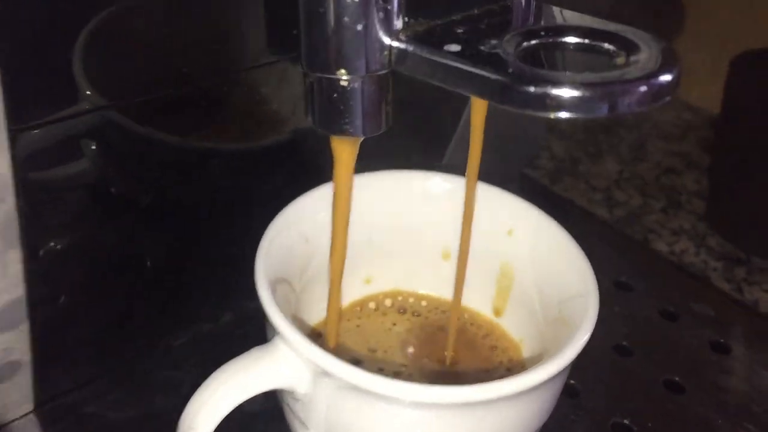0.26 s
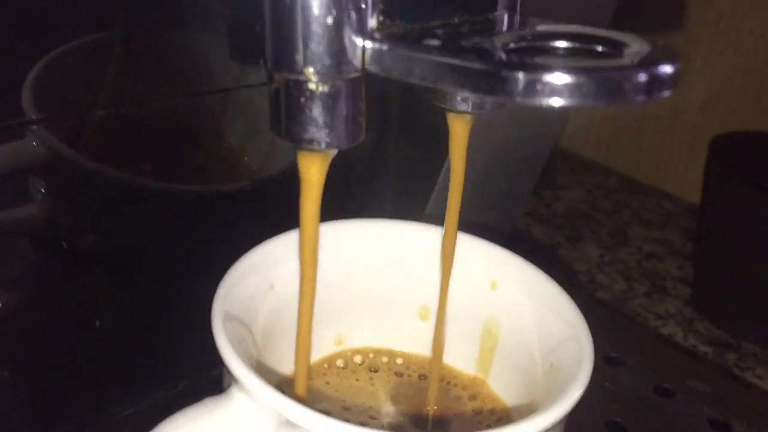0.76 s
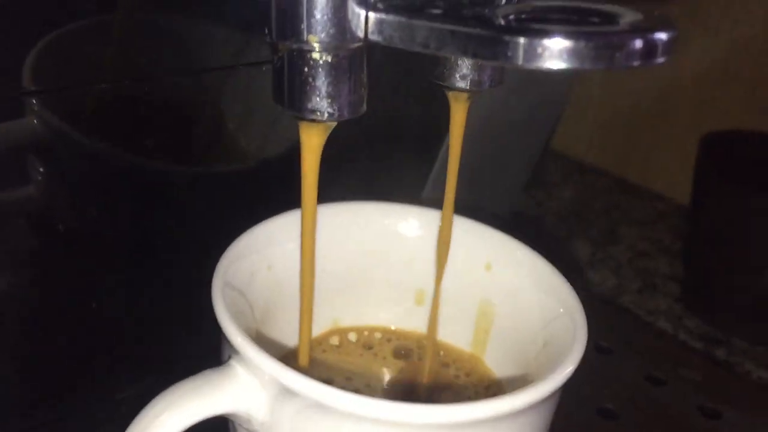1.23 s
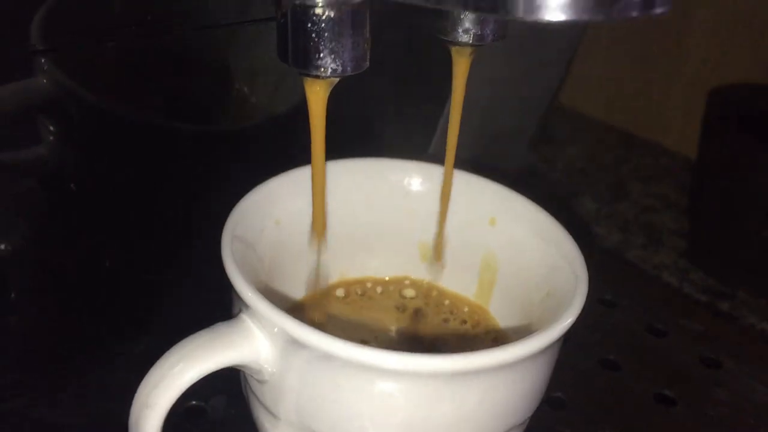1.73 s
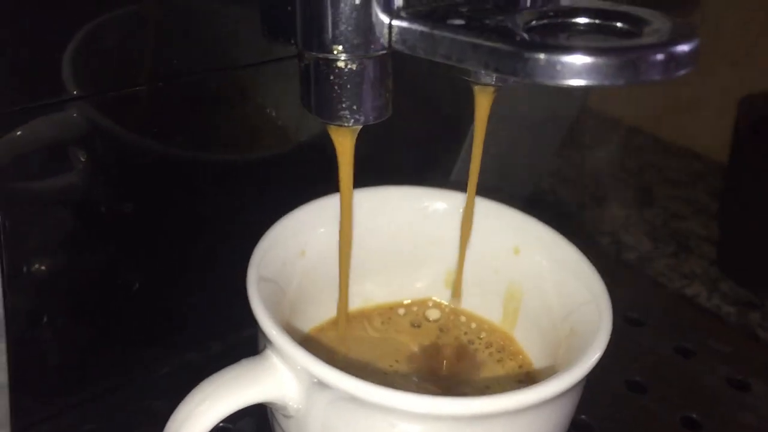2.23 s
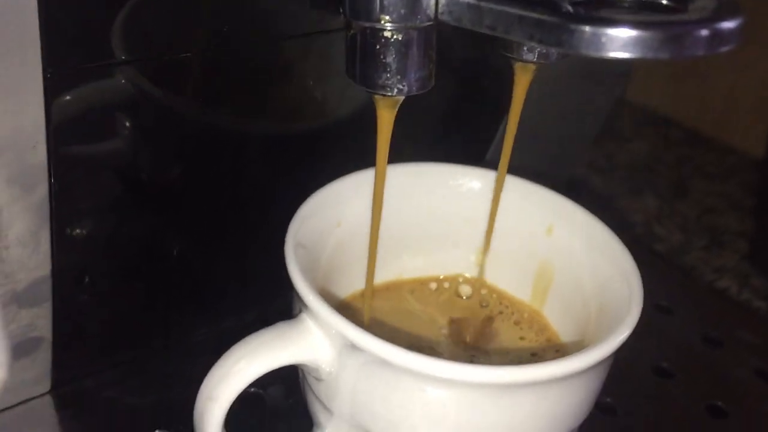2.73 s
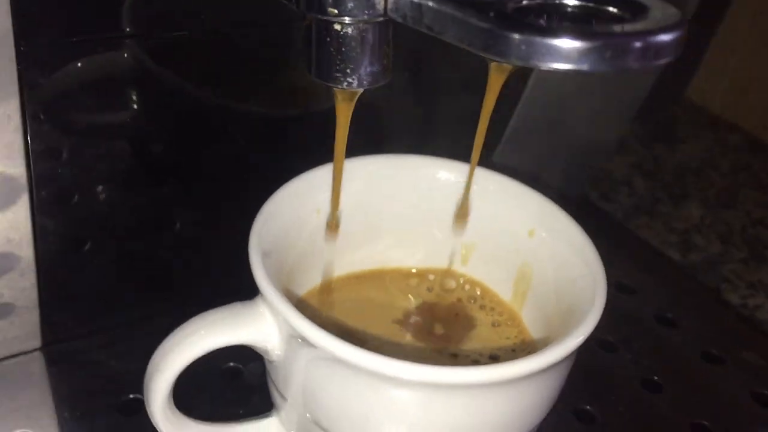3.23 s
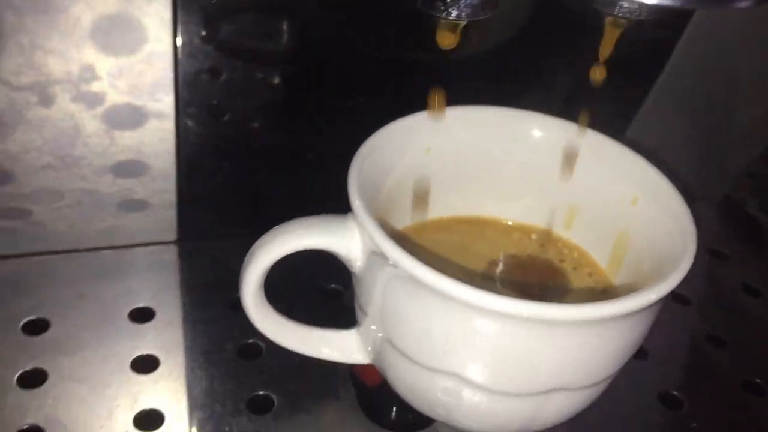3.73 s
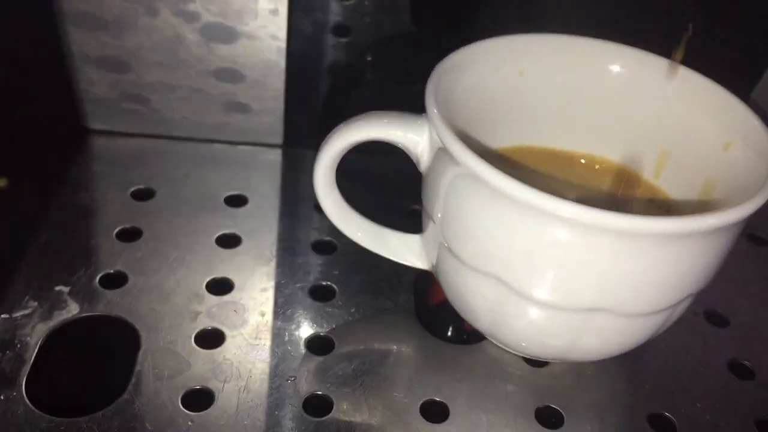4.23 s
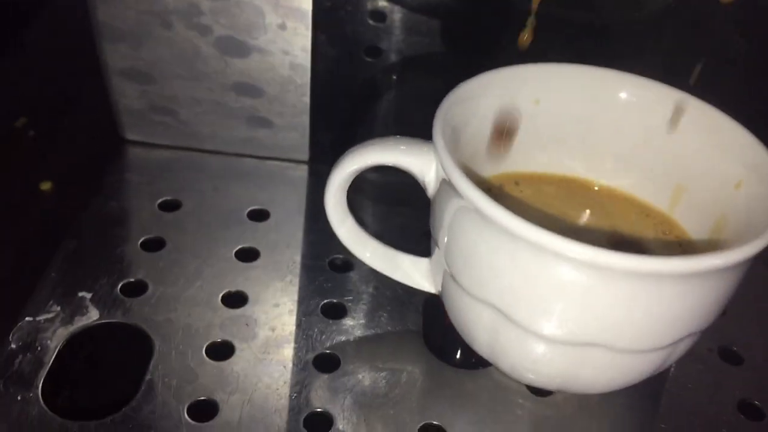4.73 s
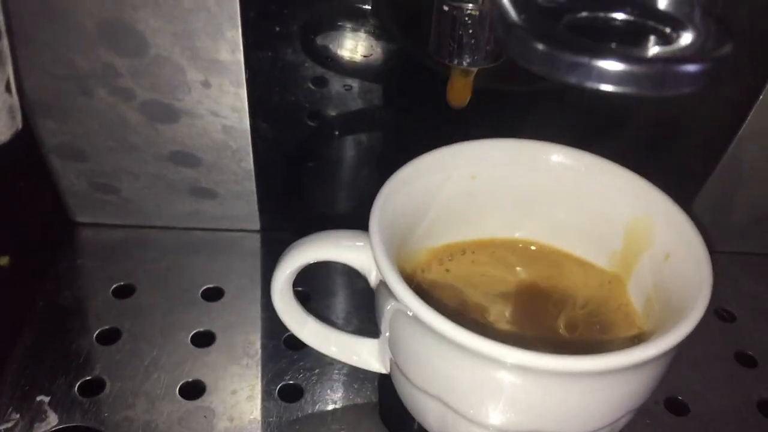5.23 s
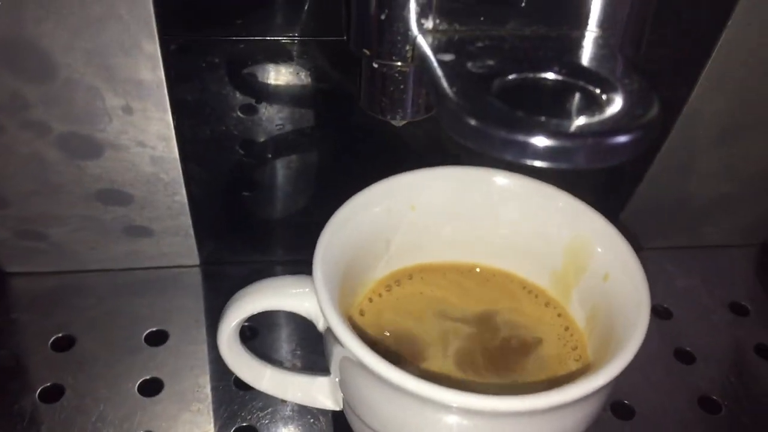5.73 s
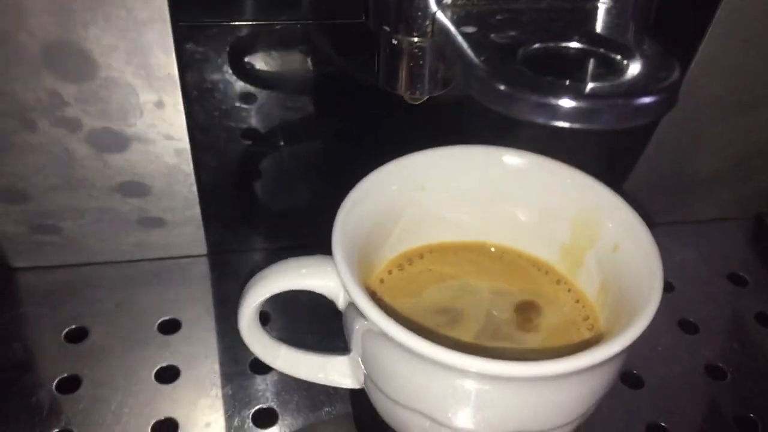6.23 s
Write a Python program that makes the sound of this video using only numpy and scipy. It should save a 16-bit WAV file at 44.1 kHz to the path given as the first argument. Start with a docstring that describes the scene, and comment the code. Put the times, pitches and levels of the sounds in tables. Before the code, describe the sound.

Close and fairly dry, in a quiet kitchen with faint room noise. From the start an espresso machine's pump gives a low, buzzing mains-rate hum with housing rattle and pulsing hiss, while coffee drops patter into a china cup. At about 0.9 seconds the pump cuts out, its hum fading quickly with a faint lingering tone. Thin streams go on trickling, with bubbly plips, small ticks and hollow cup resonances, plus a few very soft bumps around 2.4 to 2.8. After 3.3 the trickle thins to sparse, weakening drips. At 3.9 a latch snaps sharply with a brief ring. Near-silence follows until 4.4, when a geared motor starts with a clunk and scrape, spinning up quickly to a midrange whine over rumble and thin whistle. Strong plastic knocks come around 4.6, lighter ones at 4.8, 5.3 and 5.8. From 5.5 the whine strains and throbs, still running at the end, about 6.4.

```python
"""Espresso machine ending a pour

A pump hums and hisses to about 1 s: harmonics of its stroke rate with noise modulated by each stroke.
Thin streams patter into a china cup and thin to drips: each drop is a splash, a bubble and a cup resonance.
A latch snaps: noise bursts through resonant bodies. A geared motor then moves the brew unit: a mesh tone
with shaft sidebands, a thin whistle and noise, among plastic knocks and scrapes built of modes and bursts."""
import sys
import numpy as np
from scipy import signal
from scipy.fft import rfft, irfft, next_fast_len
from scipy.io import wavfile
from scipy.ndimage import uniform_filter1d

SR = 44100
rng = np.random.default_rng(int(sys.argv[2]) if len(sys.argv) > 2 else 0)


def master_out(mix):
    """Clip the mix to full scale and print it as 16-bit PCM to the path in sys.argv[1]."""
    frames = np.transpose(np.atleast_2d(mix))
    ceiling = np.clip(frames, -1, 1)
    pcm = np.round(ceiling * 32767).astype(np.int16)
    wavfile.write(sys.argv[1], SR, pcm)


N = 284886
TIME = np.arange(N) / SR
BRIEF = np.arange(8192) / SR  # time axis of one drop or knock, s


def amp(db):
    """Decibel law: level to amplitude ratio."""
    return 10 ** (np.asarray(db) / 20)


def unit(x):
    """Power normalisation: scales to rms 1."""
    return x / np.sqrt(np.mean(x ** 2) + 1e-20)


def crest(x, size=88):
    """Short-time power normalisation: the loudest 2 ms get rms 1."""
    power = uniform_filter1d(x ** 2, size, mode="constant")
    return x / np.sqrt(power.max() + 1e-20)


def add(mix, s, sound):
    """Superposition: adds a sound to the mix, in place, from time s."""
    part = mix[max(round(s * SR), 0):][:len(sound)]
    part += sound[:len(part)]


def gains(points, size):
    """Spectral envelope: levels interpolated along log frequency, on the bins of a transform."""
    hz, db = np.transpose(points)
    bins_hz = np.fft.rfftfreq(size, 1 / SR)
    return amp(np.interp(np.log(bins_hz + 1), np.log(hz + 1), db))


def noise(points):
    """Spectral shaping: white noise weighted by an envelope, rms 1."""
    size = next_fast_len(N, True)
    white = rfft(rng.standard_normal(size))
    return unit(irfft(white * gains(points, size), size)[:N])


def wander(hz):
    """Random modulation: line segments between hz random values per second, rms 1."""
    knots = rng.standard_normal(4096)
    return unit(np.interp(TIME * hz, np.arange(len(knots)), knots))


def body(points):
    """Minimum phase: the causal response of a body follows from its log spectrum by Hilbert transform."""
    log_gain = np.log(gains(points, len(BRIEF)))
    circle = np.concatenate([log_gain, log_gain[-2:0:-1]])
    return np.exp(np.conj(signal.hilbert(circle)))[:len(log_gain)]


def burst(response, rise, decay, grain_db=0):
    """Source and filter: a swelling, decaying noise burst excites a body; grain makes parts stand out."""
    shape = np.minimum(BRIEF / rise, 1) * np.exp(-np.maximum(BRIEF - rise, 0) / decay)
    grains = amp(grain_db * np.repeat(rng.standard_normal(len(BRIEF) // 32), 32))
    excitation = shape * grains * rng.standard_normal(len(BRIEF))
    return crest(irfft(rfft(excitation) * response))


def ring(hz, t60, rise, glide=0):
    """Damped mode: a sine with exponential decay, whose pitch climbs when glide is above 0."""
    phase = 2 * np.pi * hz * BRIEF * (1 + glide * (BRIEF / t60 - 1 / 4))
    decay = np.exp(-np.log(1000) * BRIEF / t60)
    return crest(np.sin(phase) * decay * (1 - np.exp(-BRIEF / rise)))


def run_down(stop, t60):
    """Free decay: full level until the stop, then an exponential fall."""
    return np.exp(-np.log(1000) * np.maximum(TIME - stop, 0) / t60)


# background spectrum: f/Hz, relative level/dB
ROOM_SPECTRUM = [(30, -8.5), (100, -5), (200, -11.5), (350, -3.5), (460, -14.5), (1500, -16.5),
                 (3000, -20.5), (7000, -24), (9300, -22.5), (10300, -31.5), (11500, -25), (15800, -27.5)]


def room_tone():
    """Broadband noise: the quiet of the kitchen, with a slight drift in level."""
    return amp(-64.5 + 0.28 * wander(4.3)) * noise(ROOM_SPECTRUM)


MAINS_HZ, PUMP_STOP_S = 50.03, .922
# pump hum: multiple of the stroke rate, level/dB (rms, before the run-down weights);
# the half orders come from unequal strokes
HUM_ORDERS = [(1, -59), (1.5, -54), (2, -45.5), (3, -34), (3.5, -47.5), (4, -46), (4.5, -57), (5, -32.5),
              (5.5, -63), (6, -42.5), (6.5, -46.5), (7, -48.5), (8, -50), (9, -52.5), (11, -57), (12, -51),
              (13, -52), (14, -48.5), (16, -51), (18, -54)]
# rattle of the housing: f/Hz, relative level/dB
RATTLE_SPECTRUM = [(30, -31), (70, -5), (200, 5), (380, 2.5), (540, -2), (660, 1), (840, 0.5), (915, 10),
                   (980, 0.5), (1230, 4.5), (1550, -10), (2100, -8.5), (3400, -14), (6000, -31),
                   (12000, -49)]
# hiss of the pump: f/Hz, relative level/dB
HISS_SPECTRUM = [(1760, -6), (3000, 1.5), (3640, -23), (3930, 6), (4220, -2), (5380, -3), (6010, 0.5),
                 (7830, -2.5), (8630, 0.5), (10300, -8), (12600, -2), (14700, -8), (15800, -15)]


def pump():
    """Periodic excitation: a piston at mains rate gives hum and modulates rattle and hiss; a panel rings on."""
    turn = 2 * np.pi * MAINS_HZ * TIME
    hum = 0
    for order, db in HUM_ORDERS:
        level = amp(db + .5 * wander(11.9)) * np.sqrt(2)
        hum = hum + level * np.cos(order * turn + rng.uniform(0, 2 * np.pi))
    hum_decay = 0.83 * run_down(0.96, .07) + 0.14 * run_down(1.0, 0.58)  # a fast and a slow part

    panel_swell = 1 - run_down(0.65, 0.11)
    panel = amp(-49) * np.sqrt(2) * np.sin(5 * turn) * run_down(0.89, 2.9) * panel_swell

    stroke = np.cos(turn - 2 * np.pi * 3 / 4)
    shaking = unit(amp(2.3 * stroke + 0.24 * wander(24.5)))
    rattle = amp(-35.5) * noise(RATTLE_SPECTRUM) * shaking
    puffs = unit(amp(4 * stroke + .9 * wander(30) + 1.5 * wander(450)))
    hiss = amp(-46.5) * noise(HISS_SPECTRUM) * puffs
    noises = rattle * run_down(PUMP_STOP_S, 0.3) + hiss * run_down(PUMP_STOP_S, 0.061)
    return hum * hum_decay + panel + noises


# drop rates: the stream's share drains away from THINS_AT_S and leaves the drips
STREAM_PER_S, DRIPS_PER_S, THINS_AT_S, DRAIN_S = 85, 8, 3.28, 0.041
# small drops: base level, the extra while the pump pushes, the fade once the streams thin
PATTER_DB, PUMPED_DB, DRIP_FADE_DB_PER_S = -49.5, 8, 20


def small_drops(count=700):
    """Random point process: drop times follow the integrated flow; rows have the columns of PLACED_DROPS."""
    draining = np.maximum(TIME - THINS_AT_S, 0)
    fallen = np.cumsum(DRIPS_PER_S + STREAM_PER_S * np.exp(-draining / DRAIN_S)) / SR
    level_db = PATTER_DB + PUMPED_DB * (TIME < PUMP_STOP_S) - DRIP_FADE_DB_PER_S * draining
    place = np.arange(count) + 2 * rng.random(count)  # jittered position in the count of fallen drops
    size, hollow, tick, pitch, cup, spray = np.clip(rng.standard_normal((count, 6)).T, -2, 2)

    s = np.interp(place, fallen, TIME)
    plip_db = np.interp(s, TIME, level_db) + 5 * np.minimum(size, 1.4)
    plip_hz = 1480 * np.exp(.13 * pitch)
    hollow_db = plip_db - 3.5 + 3 * hollow
    hollow_hz = (635 + 9 * s) * np.exp(0.032 * cup)
    tick_db = plip_db - 10.5 + 5.5 * np.minimum(tick, 1.3)
    # high ticks grow more frequent with time
    tick_hz = np.where(spray > 2.2 - .7 * s, 7000, 4550) * np.exp(0.071 * cup)
    rows = np.transpose([s, plip_db, plip_hz, hollow_db, hollow_hz, tick_db, tick_hz])
    return rows[place < fallen[-1]]


CUP_HZ = 678.4  # the pitch towards which the cup's ring settles after each drop
# single drops placed by time, loud and faint: t/s, plip level/dB, plip f/Hz, cup hollow level/dB,
# hollow f/Hz, splash tick level/dB, tick f/Hz
PLACED_DROPS = [(0.0159, -32.5, 1750, -47, 647, -49.5, 4300), (0.0538, -31.5, 1690, -45, 660, -44, 4300),
                (0.2059, -29.5, 1380, -38.5, 664, -53.5, 4200), (0.2972, -27, 1260, -46.5, 660, -42, 4500),
                (0.3097, -25, 1210, -46, 660, -36.0, 4240), (0.4444, -31, 1630, -49, 660, -46, 4200),
                (0.4604, -28.0, 1210, -40, 645, -36, 4200), (0.5402, -29.5, 1940, -44, 660, -36.5, 4370),
                (0.5526, -29.5, 1450, -39, 670, -42, 4100), (0.564, -38, 1800, -33.0, 670, -53.0, 4300),
                (0.7537, -29, 1500, -43, 660, -37, 4300), (0.832, -27.0, 1050, -32, 660, -40, 5970),
                (0.852, -26.5, 1090, -39, 660, -35, 4720), (0.9224, -46, 1540, -50, 660, -35.5, 4560),
                (1.0261, -42, 1540, -41.5, 624, -38, 8560), (1.0385, -38, 1260, -34.5, 645, -48, 4400),
                (1.0464, -45, 1510, -39, 620, -32.5, 4300), (1.0705, -34, 1160, -40, 670, -39, 4200),
                (1.112, -40, 1640, -58, 700, -60, 4500), (1.1438, -40, 1490, -43, 670, -57, 4600),
                (1.159, -42, 1410, -46, 680, -65.0, 4200), (1.2186, -37, 1870, -49, 673, -36, 4340),
                (1.266, -37, 1510, -33.5, 662, -35, 4540), (1.2888, -40, 1290, -45, 620, -47, 4600),
                (1.3005, -40, 1470, -45.5, 684, -61, 4400), (1.3139, -33.5, 1160, -43, 668, -57, 4500),
                (1.335, -49, 800, -51, 650, -57.0, 4500), (1.3578, -41.5, 1830, -49.0, 646, -46.5, 13500),
                (1.4007, -34.5, 1433, -38, 684, -38, 4750), (1.4716, -40, 1500, -45, 664, -42, 4440),
                (1.481, -45, 1810, -47.5, 676, -60, 4470), (1.5489, -44, 1520, -42, 657, -45.5, 4700),
                (1.595, -48.5, 1520, -38.5, 664, -64.5, 4600), (1.68, -47, 1430, -44, 656, -55, 4340),
                (1.715, -49, 850, -57.0, 673, -65.5, 13700), (1.7494, -31, 1504, -37.5, 667, -44.5, 4400),
                (1.7973, -42.0, 1910, -42.0, 680, -40.0, 4370),
                (1.8796, -36.5, 1460, -47.0, 630, -47, 4400), (1.91, -40.5, 1610, -45.5, 664, -50, 4370),
                (1.952, -37, 1450, -44.0, 683, -46.5, 4500), (2.0133, -36, 1510, -44, 624, -39.5, 4300),
                (2.0333, -47, 1480, -40, 660, -33, 4360), (2.045, -42, 1520, -52, 640, -53, 4500),
                (2.0976, -41, 1480, -40.5, 645, -58, 4300), (2.166, -39, 1480, -37, 660, -47, 4400),
                (2.2303, -33.0, 1460, -40.0, 644, -56, 4700), (2.2454, -35.5, 1820, -37, 662, -37.5, 4400),
                (2.3241, -38.5, 1570, -37.5, 657, -36.5, 14400),
                (2.4139, -37, 1530, -36.5, 646, -38.5, 4450), (2.4518, -29, 1520, -39, 653, -30, 4440),
                (2.478, -38, 1420, -44, 657, -46, 5560), (2.4874, -38, 1450, -41.5, 647, -49, 4100),
                (2.521, -45.0, 1700, -41.5, 662, -45, 6900), (2.533, -50.5, 1710, -48.0, 697, -41, 4370),
                (2.5671, -34, 1500, -35.5, 659, -45, 6900), (2.599, -43.5, 1490, -51, 640, -48.5, 13900),
                (2.6654, -40.5, 1440, -40, 630, -53, 4400), (2.701, -42, 1400, -43.5, 655, -53, 4630),
                (2.7736, -37.5, 1440, -41, 684, -41.5, 6050), (2.87, -60, 1830, -59, 710, -50, 4470),
                (2.9527, -36, 1470, -52, 680, -50, 4740), (2.996, -40, 1500, -58, 650, -49, 4600),
                (3.036, -36, 1600, -38.5, 663, -53.0, 4400), (3.076, -46, 1630, -45, 660, -52, 4500),
                (3.0969, -38.5, 1670, -54, 654, -39.5, 4600), (3.1428, -54, 1490, -45.5, 640, -46.5, 7300),
                (3.2365, -41, 1540, -49, 668, -49, 4000), (3.272, -47, 1500, -50, 646, -49, 7300),
                (3.3268, -44.0, 1820, -45.5, 685, -54, 4400), (3.4336, -47, 1560, -45, 680, -59, 4420),
                (3.4575, -38.5, 1497, -39, 673, -60, 4400), (3.5808, -40.5, 1620, -43.0, 675, -42.5, 4250),
                (3.651, -64, 1800, -54.0, 689, -55, 4400), (3.707, -70, 1210, -55.5, 680, -72.0, 8400),
                (3.7913, -43.5, 1230, -44, 689, -51.5, 4300), (3.8625, -45.0, 1880, -44.5, 680, -47, 4240)]
# colour of a drop's plop: f/Hz, relative level/dB
PLOP_SPECTRUM = [(80, -38.5), (200, -32), (400, -23), (560, -24), (850, -13.5), (960, -32), (1100, -2),
                 (1250, -15.5), (1490, 4), (1900, -2), (2150, -24), (2330, -17), (2900, -24), (5000, -52)]
# colour of a drop's tick: f/Hz, relative level/dB
TICK_SPECTRUM = [(100, -21), (400, -7), (900, -11), (1500, -9), (2400, -9), (2850, -23), (3200, 1.5),
                 (3750, -3.5), (4400, 12), (5200, 0.5), (5800, -4), (6600, -3.5), (8500, -7.5),
                 (10200, -12.5), (12000, -4.5), (14000, -8), (16000, -9)]


def pour():
    """Bubble and cavity resonance: a drop ticks on the crema, traps a rising bubble and rings the cup's air."""
    out, plop, tick = np.zeros(N), body(PLOP_SPECTRUM), body(TICK_SPECTRUM)
    drops = np.vstack([PLACED_DROPS, small_drops()])
    for s, plip_db, plip_hz, hollow_db, hollow_hz, tick_db, tick_hz in drops:
        softness = 2 ** rng.uniform(-0.21, 0.73)  # foam cushions some drops more than others

        gulp = ring(hollow_hz, t60=.038, rise=.006, glide=.02)
        gulp = gulp + .14 * ring((hollow_hz + CUP_HZ) / 2, t60=.085, rise=.006)

        bubble = ring(plip_hz, t60=0.015 * softness, rise=0.0015 * softness, glide=0.03)
        bubble = bubble + 0.94 * burst(plop, rise=0.00075 * softness, decay=0.0017)

        splash = burst(tick, rise=.00008 * softness, decay=0.0011 * softness)
        splash = splash + 0.85 * ring(tick_hz, t60=.006 * softness, rise=0.00015)

        drop = amp(hollow_db) * crest(gulp) + amp(plip_db) * crest(bubble)
        add(out, s, drop + amp(tick_db) * crest(splash))
    return out


def kitchen(x, t60, wet_db):
    """Reverberation: faint scattered, decaying reflections from the machine's alcove and the room."""
    t = np.arange(SR // 2) / SR
    sparse = rng.random(len(t)) < 2500 / SR  # on average 2500 echoes a second
    decay = np.exp(-np.log(1000) * t / t60)
    taps = rng.standard_normal(len(t)) * sparse * (t > .002) * decay
    return x + amp(wet_db) * signal.fftconvolve(x, taps / np.linalg.norm(taps))[:N]


# soft low bumps: t/s, level/dB, f/Hz
SOFT_BUMPS = [(2.415, -52, 330), (2.73, -57, 310), (2.765, -59, 250), (2.835, -56, 100)]


def bumps():
    """Band-limited impact: each soft bump is a noise burst through one broad low resonance."""
    out = np.zeros(N)
    for s, db, bump_hz in SOFT_BUMPS:
        hump = [(bump_hz / 4, -24), (bump_hz, 0), (bump_hz * 2, -16), (bump_hz * 10, -60)]
        add(out, s, amp(db) * burst(body(hump), rise=0.0086, decay=0.021))
    return out


# snap of the latch: f/Hz, relative level/dB
SNAP_SPECTRUM = [(300, -53), (500, -9), (680, -2), (1000, -3), (1600, -6), (2200, -14), (3100, 1),
                 (4200, -6), (5600, -18), (7500, 4.5), (8800, 1.5), (10000, -15), (11050, 7.5),
                 (12300, -11), (14700, -3), (16000, -3)]
# ring of the housing after the snap: f/Hz, relative level/dB
HOUSING_SPECTRUM = [(300, -16), (660, 5.5), (1000, -1), (1600, -12), (2300, -12), (2720, 7.5), (2950, 6),
                    (3500, -2.5), (4400, -5), (5600, -17), (7600, 5), (9800, -5), (11100, 1), (12200, -18),
                    (15000, -4)]


def latch():
    """Impulsive excitation: one hard snap, and the ring of the housing after it."""
    out = np.zeros(N)
    add(out, 3.8803, amp(-17.5) * burst(body(SNAP_SPECTRUM), rise=.0012, decay=.0042))
    add(out, 3.883, amp(-38) * burst(body(HOUSING_SPECTRUM), rise=.0057, decay=.033))
    return out


MESH_HZ, SLOW_HZ, FAST_HZ = 1254.6, 22.7, 33.2  # tooth mesh at full speed, and the two shafts
WHINE_DB, WHINE_SWELL_S = -0.07, 0.16
# the gears take hold with a short squeal
BITE_S, BITE_WIDTH_S, BITE_DB = 4.457, .02, -27
TIGHTEST_S = 5.94  # where both shafts press the teeth together at once
# gear whine: sideband order of the slow shaft, of the fast shaft,
# level/dB running light, level/dB under load (before WHINE_DB)
WHINE_SIDEBANDS = [(0, 0, -37.5, -34), (-1, 0, -42, -35), (1, 0, -43, -44), (-1, 1, -50, -39),
                   (0, 1, -44, -47), (-1, -1, -42, -52), (-2, 0, -50, -47), (-2, -1, -51, -45),
                   (1, 1, -54, -49), (2, 1, -50, -53), (0, -1, -50, -52), (4, 0, -56, -50)]


def gear_whine(turn, age, load):
    """Modulation sidebands: two slightly eccentric shafts modulate the mesh tone, which throbs under load."""
    shafts = 2 * np.pi * (TIME - TIGHTEST_S)
    slack, whine = 1 - load, 0
    for m, n, light_db, loaded_db in WHINE_SIDEBANDS:
        # with slack in the gears the sidebands fall out of step: a flutter in place of a throb
        lag = slack * np.pi / 2 * (m ** 2 + n ** 2) + (.07 + .33 * slack) * wander(9)
        phase = MESH_HZ * turn + (m * SLOW_HZ + n * FAST_HZ) * shafts + lag
        whine = whine + amp(loaded_db + slack * (light_db - loaded_db)) * np.cos(phase)
    swell = amp(WHINE_DB) * np.minimum(age / WHINE_SWELL_S, 1)
    bite = amp(BITE_DB) * np.exp(-((TIME - BITE_S) / BITE_WIDTH_S) ** 2)
    return swell * whine + bite * np.cos((MESH_HZ - SLOW_HZ) * turn)


# whistle: pitch without load, the share by which it sags under full load, base levels, swell time
WHISTLE_HZ, WHISTLE_SAG = 4097, .017
WHISTLE_LIGHT_DB, WHISTLE_LOADED_DB, WHISTLE_SWELL_S = -58, -62, .55
# partials of the whistle: multiple of its pitch, level/dB running light, level/dB under load
# (both relative to the base levels)
WHISTLE_PARTIALS = [(2 / 9, 7, 0), (1 / 3, 4, 5), (2 / 3, -2, -10), (1, -1.5, -1), (7 / 6, -19, -22),
                    (2, -30, -17)]


def pinion(age, load):
    """Frequency modulation: a thin wavering whistle swells in; load lowers its pitch and most partials."""
    waver = .002 * wander(12) + .0055 * wander(260)
    turn = 2 * np.pi * np.cumsum(WHISTLE_HZ * (1 - WHISTLE_SAG * load) * (1 + waver)) / SR
    whistle = 0
    for k, light_db, loaded_db in WHISTLE_PARTIALS:
        level_db = (1 - load) * (WHISTLE_LIGHT_DB + light_db) + load * (WHISTLE_LOADED_DB + loaded_db)
        whistle = whistle + amp(level_db + 2.8 * wander(18)) * np.cos(k * turn)
    return np.minimum(age / WHISTLE_SWELL_S, 1) * whistle


# the motor starts slow by the share START_LAG, with a surge of rumble, and settles at full speed
START_S, START_LAG, SPIN_UP_S = 4.364, .15, .075
RUMBLE_DB, SURGE_DB, SURGE_S = -31.5, 1, 0.21
# load on the gears: t/s, load (0 to 1)
GEAR_LOAD = [(4.45, 0.15), (4.6, 0.35), (4.7, 0.05), (4.8, 0.62), (4.89, 0.01), (5.3, 0.01), (5.47, 0.15),
             (5.55, .92), (5.8, 1), (6.46, 0.95)]
# steady tones of the motor: f/Hz at full speed, level/dB (rms, before a common trim)
MOTOR_TONES = [(81, -55.5), (200, -49.5), (230, -52.5), (300.3, -40), (400.3, -44.5), (500.6, -45.5),
               (600.6, -46), (696, -49), (770, -62.5)]
# rumble of the gear train: f/Hz, relative level/dB
RUMBLE_SPECTRUM = [(25, -34.5), (55, -13.5), (80, 3), (140, 0.5), (220, 6.5), (270, 0), (350, 7), (480, 7),
                   (700, 7.5), (830, -2), (1040, -3.5), (1250, 11.5), (1450, -4), (1750, -29), (5000, -58)]
# thin rasp of the gear train: f/Hz, relative level/dB
RASP_SPECTRUM = [(1300, -6), (1600, 3.5), (2200, -5), (2690, 4.5), (2880, -7.5), (3100, -3.5), (3480, -2.5),
                 (3880, -11.5), (4050, -6), (4300, -11), (4700, -13), (5000, -20), (5250, -13.5),
                 (5600, -17), (5950, -13), (6300, -21), (6700, -14), (7000, -20), (7250, -16),
                 (7650, -24.5), (8070, -14.5), (8450, -24.5), (9000, -20), (10400, -28.5), (11500, -23),
                 (12800, -31), (14000, -28), (15800, -38)]


def motor():
    """Rotating machinery: tones follow the shaft speed, over the broadband rumble and rasp of the gears."""
    age = np.maximum(TIME - START_S, 0)
    load = np.clip(np.interp(TIME, *np.transpose(GEAR_LOAD)), 0, 1)
    running = np.minimum(age / 0.0079, 1)
    speed = (1 - START_LAG * np.exp(-age / SPIN_UP_S)) * (1 + .001 * wander(20))
    turn = 2 * np.pi * np.cumsum(speed) / SR  # phase of a 1 Hz tone at full speed

    tones = 0
    for hz, db in MOTOR_TONES:
        phase = hz * turn + 0.21 * wander(8.6) + rng.uniform(0, 2 * np.pi)
        tones = tones + amp(db + 2 * wander(7)) * np.cos(phase)
    pitched = gear_whine(turn, age, load) + amp(-.5) * tones + pinion(age, load)

    body_db = RUMBLE_DB + SURGE_DB * np.exp(-age / SURGE_S)
    rumble = amp(body_db - 1 + 1.63 * wander(45)) * noise(RUMBLE_SPECTRUM)
    rasp = amp(body_db - 20.5 + 1.55 * wander(60)) * noise(RASP_SPECTRUM)
    return running * (np.sqrt(2) * pitched + rumble + rasp)


# hard knocks: t/s, knock level/dB, knock f/Hz, thud level/dB, clack level/dB, brightness f/Hz
HARD_KNOCKS = [(4.368, -32, 1230, -33, -54, 3000), (4.5678, -20, 1080, -25, -28.5, 9000),
               (4.584, -40, 1035, -25.5, -55, 3000), (4.6201, -17.5, 900, -24, -34, 2500),
               (4.803, -37, 1030, -34, -38, 4500), (5.337, -41, 1035, -32, -45.5, 3500),
               (5.826, -31, 1490, -35, -33, 5000)]
# rebounds of each knock: nominal delay t/s, level/dB relative to the clack
REBOUNDS = [(0, -8), (.003, -12), (.007, -14), (0.011, -18)]
# scrapes and rattles: t/s, thud level/dB, clack level/dB, brightness f/Hz, rise t/s, decay t/s
SCRAPE_EVENTS = [(4.382, -25, -39.5, 14000, .0046, 0.045), (4.495, -56, -44, 9000, 0.0011, 0.0073),
                 (4.571, -34, -41, 3500, .002, .007), (4.597, -40, -38, 3500, 0.0072, .012),
                 (4.779, -35, -36, 12000, .022, 0.012), (5.335, -36, -38.5, 2990, 0.0032, 0.0085),
                 (5.491, -43, -45.5, 9000, 0.0079, .019), (5.828, -32, -32.5, 4430, 0.0014, 0.0065)]
# modes of the plastic frame: f/Hz, relative level/dB, t60/s
FRAME_MODES = [(1718, -4.5, 0.055), (2035, 1, 0.039), (3330, 1.5, 0.021), (3750, -4, 0.04),
               (6725, -3, 0.023)]
# colour of the brew unit's thud: f/Hz, relative level/dB
THUD_SPECTRUM = [(25, -42), (60, -18), (150, 10.5), (300, 0), (680, 0.5), (1100, 1.5), (1600, -9.5),
                 (3000, -69.5)]
# colour of the brew unit's clack: f/Hz, relative level/dB
CLACK_SPECTRUM = [(800, -18), (1450, -8), (1880, -1), (2400, -2.5), (2900, 1), (3270, 4.5), (3550, -9.5),
                  (3750, 2.5), (4300, -6.5), (5900, -10.5), (6700, -2.5), (7100, -8), (9000, -11),
                  (12000, -17.5), (16000, -23)]


def knocks():
    """Modal impact: plastic parts of the brew unit strike, rebound and slide, exciting its modes."""
    out, thud, clack = np.zeros(N), body(THUD_SPECTRUM), body(CLACK_SPECTRUM)
    hz = np.fft.rfftfreq(len(BRIEF), 1 / SR)
    frame = rfft(sum(amp(db) * ring(mode_hz, t60, rise=0.00067) for mode_hz, db, t60 in FRAME_MODES))

    def dulled(response, bright_hz):
        """Contact stiffness: a softer contact weakens the treble, as a two-pole low-pass."""
        return response / (1 + 1j * hz / bright_hz) ** 2

    for s, knock_db, knock_hz, thud_db, clack_db, bright_hz in HARD_KNOCKS:
        add(out, s, amp(knock_db) * ring(knock_hz, t60=0.0086, rise=0.00093))
        add(out, s, amp(thud_db) * ring(203, t60=.04, rise=.005))
        add(out, s, amp(clack_db) * crest(irfft(dulled(frame, bright_hz))))
        for delay, db in REBOUNDS:
            contact = burst(dulled(clack, bright_hz), rise=.0001, decay=0.00029)
            add(out, s + delay * rng.uniform(.8, 1.3), amp(clack_db + db) * contact)
    for s, thud_db, clack_db, bright_hz, rise, decay in SCRAPE_EVENTS:
        add(out, s, amp(thud_db) * burst(thud, rise, decay))
        add(out, s, amp(clack_db) * burst(dulled(clack, bright_hz), rise, decay, grain_db=5.5))
    return out


def scene():
    """Superposition: the machine and the cup over the quiet of the kitchen."""
    echoing = kitchen(pour() + bumps() + knocks(), t60=0.12, wet_db=-10.5)
    return (room_tone() + pump() + echoing + latch() + motor())[None]


EDGE_HZ = 15850


def record(dry):
    """Band limitation: a linear-phase low-pass filter removes the highest treble."""
    low_pass = signal.firwin(401, EDGE_HZ, window=("kaiser", 9), fs=SR)
    return signal.oaconvolve(dry, low_pass[None], "same")


dry = scene()
out = record(dry)
master_out(out)
```